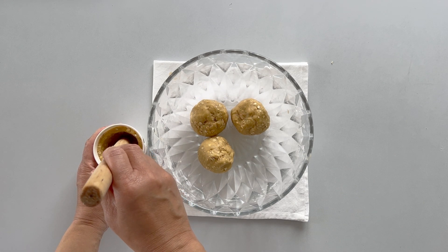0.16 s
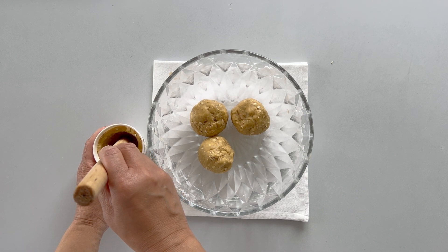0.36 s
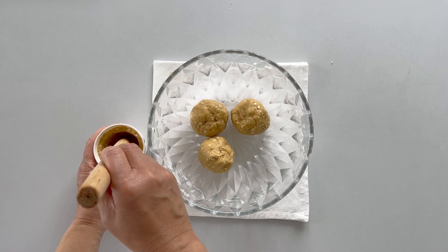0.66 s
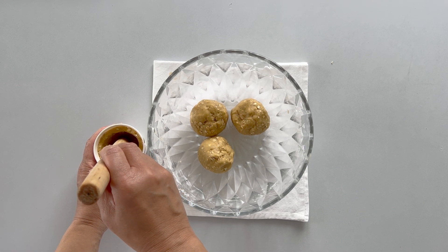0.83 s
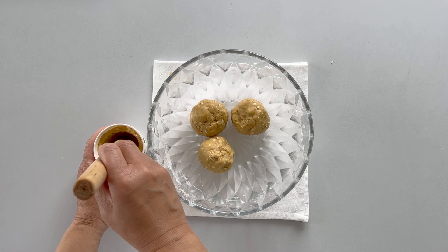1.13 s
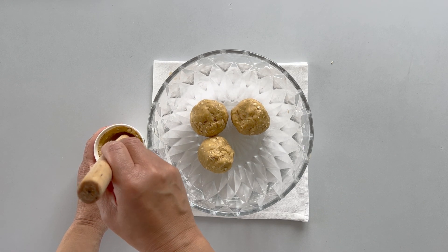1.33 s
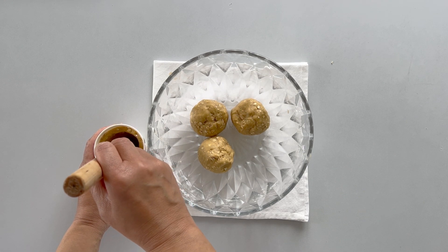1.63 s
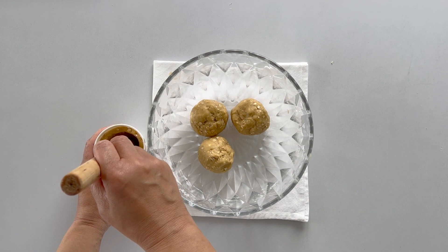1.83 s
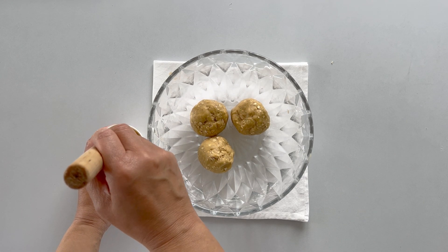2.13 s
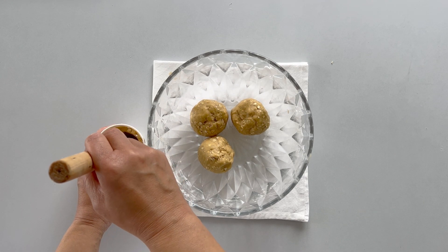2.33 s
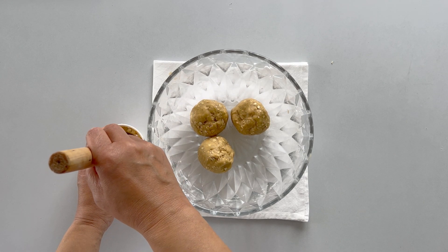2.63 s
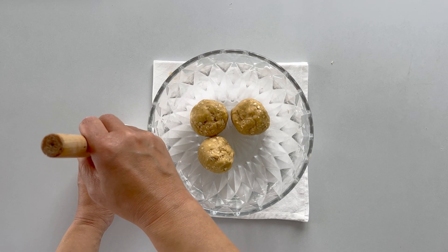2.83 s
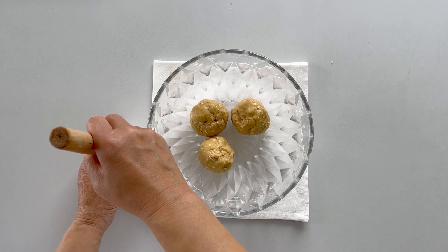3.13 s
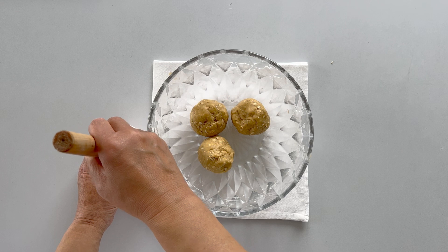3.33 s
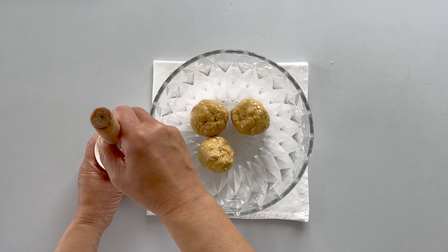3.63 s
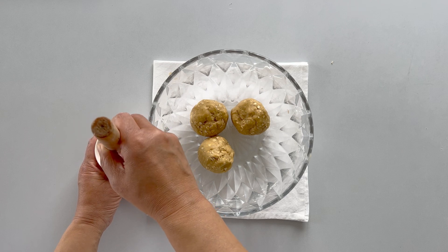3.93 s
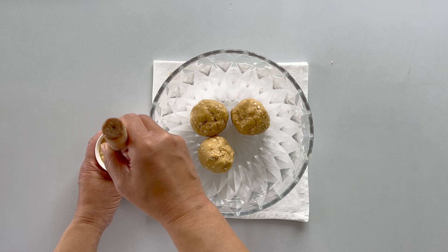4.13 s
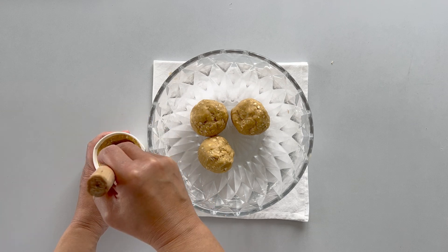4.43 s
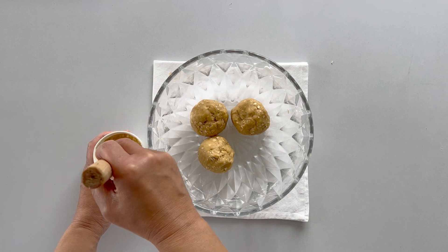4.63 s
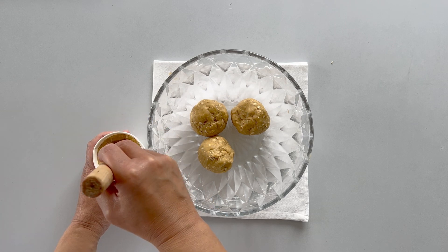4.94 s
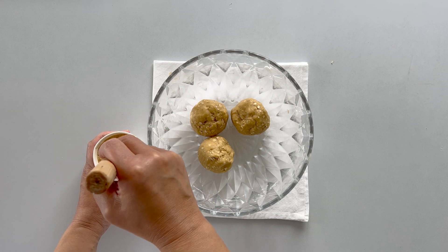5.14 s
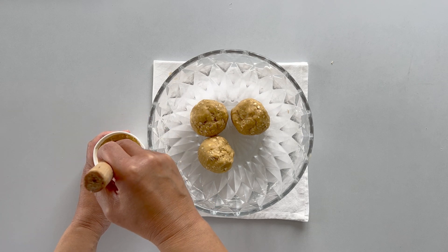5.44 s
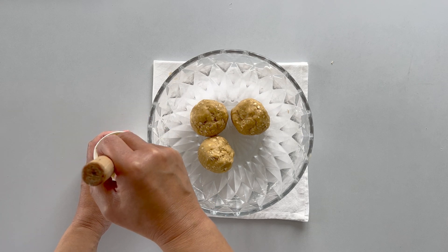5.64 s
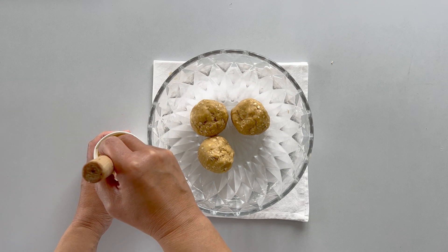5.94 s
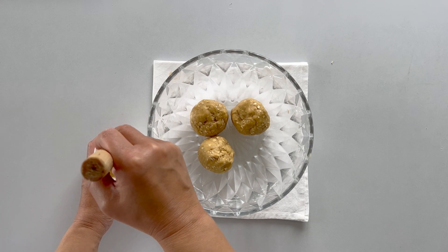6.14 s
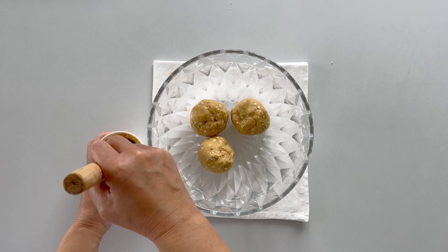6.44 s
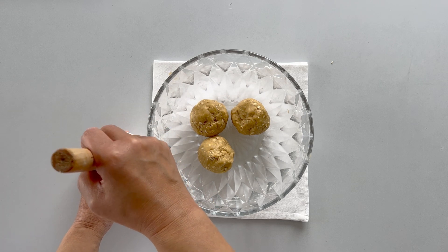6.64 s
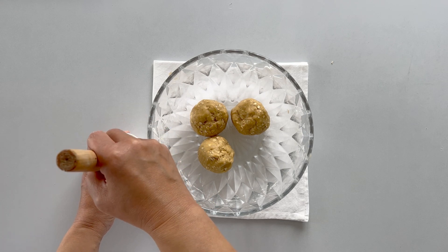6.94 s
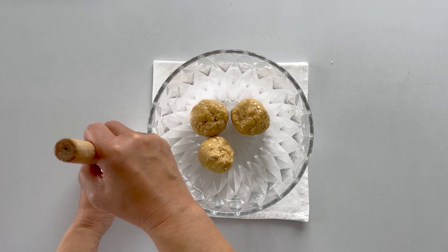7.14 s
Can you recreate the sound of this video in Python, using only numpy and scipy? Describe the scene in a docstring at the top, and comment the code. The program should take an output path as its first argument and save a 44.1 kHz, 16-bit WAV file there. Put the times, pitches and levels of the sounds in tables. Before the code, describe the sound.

A wooden tamper presses sticky dough into a small mould, each push thudding dully on the counter over a soft, low background wash.

```python
"""A wooden tamper presses dough into a small mould on a kitchen counter.
Each push knocks the mould on the counter top: noise and decaying modes pass through the slab and ring a small room.
Bursts of fine noise grains give the dough's sticky crackle; short modes give the taps of wood on the mould.
Behind lie dull room noise and a wavering wash, a low drone that swells and passes, a hum, a whirr and faint chirps."""
import sys
import numpy as np
from scipy import signal
from scipy.fft import rfft, irfft, next_fast_len
from scipy.io import wavfile
from scipy.ndimage import uniform_filter1d

SR = 44100
rng = np.random.default_rng(int(sys.argv[2]) if len(sys.argv) > 2 else 0)


def materialize(psi):
    """Save the field psi as 16-bit PCM at rate SR to the path in sys.argv[1].

    A 1-D psi becomes a single channel; in a 2-D psi each row is a channel.
    """
    bounded = np.clip(np.atleast_2d(psi).T, -1, 1)
    quanta = np.round(bounded * 32767).astype(np.int16)
    wavfile.write(sys.argv[1], SR, quanta)


N = 320864  # samples

# All levels in the tables are relative.
# knocks of the mould on the counter; a high contact corner is hard, a low one is cushioned by dough:
# (time [s], level [dB], contact corner [Hz], share landing a second time [ratio])
KNOCKS = [(0.4803, -25.5, 685, 0.15), (1.198, -48.5, 398, 0), (1.9534, -23.5, 990, 0),
          (2.6617, -46.5, 750, 0.66), (2.7047, -20, 900, 0.058), (3.375, -38, 473, 0.14),
          (4.123, -26, 326, 0.32), (4.658, -39, 240, 0.061), (5.0525, -22, 390, 0.075),
          (5.5112, -33.5, 260, 0.26), (6.026, -36, 328, 1), (6.389, -51, 257, 0), (6.559, -27, 367, 0.47),
          (6.5661, -22.5, 463, 0.034), (6.5754, -24, 690, 0.068), (6.979, -57.5, 900, 0),
          (7.218, -44, 320, 0)]
# modes of the counter top with the mould on it: (frequency [Hz], level [dB], t60 [s])
COUNTER_MODES = [(139.8, -17.5, 0.13), (206.4, -5.5, 0.13), (282.5, -3.5, 0.056), (327, 0.5, .13),
                 (425, -2, 0.043), (515.6, -5.5, 0.068), (596, -0.5, 0.023), (803, -10.5, 0.055),
                 (879, -16.5, 0.079), (1042, -7.5, 0.025), (1232, -4.5, 0.013), (1532, 3.5, 0.014),
                 (2088, -17.5, 0.15)]
# modes of the mould under a tap: (frequency [Hz], level [dB], t60 [s])
MOULD_MODES = [(1470, -1, 0.014), (1720, 7.5, 0.014), (2250, -18, 0.012), (3850, -13, 0.018),
               (4700, -20, 0.0092)]
# the tamper squeezes the dough and grazes the mould's wall: (time [s], wall tap [dB], dough crackle [dB])
TOUCHES = [(0.48, -68, -73), (1.2, -66.5, -73.5), (1.952, -63, -60), (2.699, -60, -64.5),
           (3.375, -66.5, -72), (4.113, -67.5, -66), (4.427, -71, -83.5), (4.630, -70.5, -70),
           (5.051, -66.5, -69.5), (5.495, -68.5, -73), (6.0162, -59, -70.5), (6.551, -69.5, -68.5),
           (6.980, -69.5, -77), (7.228, -75, -81)]
# sharp snaps of wood on the rim before the hardest knocks:
# (time [s], level [dB], decay constant [s], tilt [dB per octave])
RIM_SNAPS = [(1.935, -49.5, 0.005, 2.5), (2.661, -66.5, 0.013, -3.5)]
# dough peeling off the tamper between pushes: (time [s], level [dB], decay constant [s])
DOUGH_PEELS = [(0.186, -86, 0.18), (0.931, -84, 0.2), (3.85, -81, .025), (4.074, -74, .017),
               (6.161, -79.5, .023), (6.833, -79.5, 0.049)]
# colour of the sticky crackle: (frequency [Hz], level [dB])
STICKY_COLOUR = [(300, -0.5), (1700, 6.5), (2700, -3), (3700, 2), (5200, -6.5), (7400, 3.5), (8600, 1),
                 (10000, -31.5), (12000, 3), (15000, -11), (17000, -15)]
# decay of the room's tail: (frequency [Hz], t60 [s])
ROOM_T60 = [(100, 0.39), (300, 0.32), (800, 0.2), (2000, 0.24), (6000, 0.24), (14000, 0.14)]
# colour of the room's tail: (frequency [Hz], level [dB])
ROOM_COLOUR = [(80, -2), (200, -10), (330, -7.5), (500, -5), (800, 10), (1100, 7), (1600, 3), (2200, 3),
               (3000, 2), (14000, 0.5)]
# left-right likeness of the room's tail: (frequency [Hz], correlation [-1 to 1])
ROOM_LIKENESS = [(100, 0.97), (300, 0.79), (500, 0.23), (800, -0.75), (1500, 0.15), (4000, -0.015)]
# spectrum of the steady room noise: (frequency [Hz], density [dB per Hz])
AIR_COLOUR = [(25, -25), (30, 1), (42, 1), (80, -9.5), (125, -11), (200, -13), (400, -33.5), (2000, -38.5),
              (3200, -52), (5500, -55), (6900, -52), (9800, -68.5), (12500, -58.5), (15500, -68.5)]
# left-right likeness of room noise and wash: (frequency [Hz], correlation [-1 to 1])
AIR_LIKENESS = [(60, 0.97), (300, 0.71), (700, 0.1), (1500, 0.18), (4000, 0.22), (12000, 0.14)]
# spectrum of the distant wash: (frequency [Hz], density [dB per Hz])
WASH_COLOUR = [(100, -19.5), (280, 7.5), (450, 3), (850, -0.5), (1020, -4), (1250, -2), (2100, -12.5),
               (2600, -21), (3100, -30.5), (4000, -44.5)]
# course of the distant wash: (time [s], level [dB])
WASH_COURSE = [(0.0, -64), (0.4, -62.5), (1.34, -67.5), (1.8, -65.5), (2.09, -62.5), (4.07, -67),
               (6.65, -67), (6.77, -70.5), (7.28, -73)]
# faint, high, distant chirps: (time [s], pitch [Hz], level [dB])
CHIRPS = [(1.295, 5700, -88), (2.315, 5400, -90), (3.29, 5250, -88), (7.065, 5030, -93)]

ROCK_S = 0.00674  # a tilted mould lands a second time this much later
# the softer the contact, the more of the hand's weight follows: corner for an equal share, exponent, ceiling
SOFT_HZ, FOLLOW_POWER, FOLLOW_MAX = 283, 5.1, 1.36
# the dough yields just before the wall is met: lead, decay constant, tilt per octave
SQUEEZE_LEAD_S, SQUEEZE_S, SQUEEZE_TILT_DB = 0.016, 0.018, 11
PEEL_TILT_DB = 14  # per octave: thin and fine
CHIRP_S = 0.021  # half-width of a chirp's bell-shaped envelope, where it has fallen to 1/e
# when each background swell is at its fullest (from s, to s), and its level there
DRONE_SPAN, DRONE_DB = (3.37, 3.62), -52
HUM_SPAN, HUM_DB = (1.95, 2.5), -59.5
WHIRR_SPAN, WHIRR_DB = (0.62, 1.1), -76.5
TOP_HZ = 15750  # band limit


def knocks(crack_db=-5, crack_t60=0.071, follow_s=0.00322, follow_hz=900, pad_hz=3500):
    """Every downward push rings the same counter modes; the dough cushions the high ones."""
    out = np.zeros((2, N))
    t = np.arange(SR // 2) / SR
    for s, db, corner_hz, rock in KNOCKS:
        crack = amp(crack_db - 60 * t / crack_t60) * rng.standard_normal(len(t))
        blow = crack - ringing(COUNTER_MODES, t, vary_db=2.17)
        # on a soft press the dough yields first, and the weight of the hand arrives a moment later
        follow = min((SOFT_HZ / corner_hz) ** FOLLOW_POWER, FOLLOW_MAX)

        def path(f):
            contact = 1 / (1 + 1j * f / corner_hz) ** 2 / (1 + 1j * f / pad_hz)
            hand = follow * lag(f, follow_s) / (1 + (f / follow_hz) ** 2)
            second_landing = rock * lag(f, ROCK_S)
            return slab(f) * contact * (1 + hand + second_landing)

        add(out, s, amp(db) * kitchen(filtered(blow, path), wet_db=-4.5))
    return out


def slab(hz, travel_s=0.005144, edge=0.22, edge_s=0.0091, radiate_hz=220):
    """Way through the counter top: bending waves, a return from its edge, weak radiation of the bass."""
    # bending waves slow down at low pitch, so each knock is a short falling chirp; travel_s holds at 300 Hz
    bending = lag(np.sqrt(300 * hz), 2 * travel_s)
    edge_return = edge * lag(hz, edge_s) / (1 + 1j * hz / 2500)
    radiation = (1j * hz / (radiate_hz + 1j * hz)) ** 2
    return bending * (1 - edge_return) * radiation


def ringing(modes, t, vary_db):
    """Decaying modes, a little different in balance at every blow."""
    total = 0
    for hz, db, t60 in modes:
        level_db = db + rng.normal(0, vary_db)
        total = total + amp(level_db - 60 * t / t60) * np.sin(2 * np.pi * hz * t)
    return total


def tamper():
    """The wood squeezes the dough, taps the wall, snaps on the rim and peels free."""
    out = np.zeros((2, N))
    for s, tap_db, dough_db in TOUCHES:
        add(out, s - SQUEEZE_LEAD_S, amp(dough_db) * crackle(SQUEEZE_S, SQUEEZE_TILT_DB))
        add(out, s, amp(tap_db) * tap())
    for s, db, decay_s, tilt_db in RIM_SNAPS:
        add(out, s, amp(db) * crackle(decay_s, tilt_db))
    for s, db, decay_s in DOUGH_PEELS:
        add(out, s, amp(db) * crackle(decay_s, PEEL_TILT_DB))
    return out


def tap(graze=0.1, graze_s=0.0048):
    """A light touch of wood on the mould: an impulse and a brief scrape drive its modes."""
    t = np.arange(SR // 3) / SR
    scrape = graze * rng.standard_normal(len(t)) * np.exp(-t / graze_s)
    force = (t == 0) + scrape
    struck = signal.fftconvolve(force, ringing(MOULD_MODES, t, vary_db=0.5))[:len(t)]
    return kitchen(struck, wet_db=-6)


def crackle(decay_s, tilt_db, clump_db=5, snap_s=0.014):
    """A burst of sticky noise grains: short ones snap, longer ones swell first."""
    t = np.arange(SR // 2) / SR
    clumps = unit(uniform_filter1d(rng.standard_normal(len(t)), size=30))
    grains = unit(rng.standard_normal(len(t)) * amp(clump_db * clumps))
    rise_s = np.clip(decay_s - snap_s, 0.0002, 0.012)
    burst = grains * np.minimum(t / rise_s, np.exp((rise_s - t) / decay_s))

    def colour(f):
        octaves = np.log2(np.maximum(f, 1000) / 12000)
        return amp(along(STICKY_COLOUR, f) + tilt_db * octaves)

    return kitchen(filtered(burst, colour), wet_db=0.5)


def kitchen(x, wet_db, gap_s=0.0086, build_s=0.0016):
    """Direct sound plus the room's diffuse tail: noise that builds after a gap and decays by pitch."""
    t = np.arange(len(x)) / SR
    noise = stereo_noise(len(x), ROOM_COLOUR, ROOM_LIKENESS)
    hz, frames, bins = signal.stft(noise, SR, nperseg=256)
    decay = amp(-60 * frames / along(ROOM_T60, hz)[:, None])
    tail = signal.istft(bins * decay, SR, nperseg=256)[1][:, :len(x)]
    build = 1 + np.tanh((t - gap_s) / build_s)
    tail = unit(tail * build) / np.sqrt(len(x))
    return x + amp(wet_db) * signal.fftconvolve(x[None], tail, axes=1)[:, :len(x)]


def background():
    """Everything behind the tamper, set slightly to the left."""
    low_hum = swell(HUM_SPAN, HUM_DB, fade_db_per_s=23.5) * hum(centre_hz=200.5, width_hz=31)
    whirr = swell(WHIRR_SPAN, WHIRR_DB, fade_db_per_s=49.5) * hum(centre_hz=1960, width_hz=320)
    balance = amp([[0.6], [-0.6]])  # dB, left and right
    return (air() + wash() + drone() + low_hum + whirr + chirps()) * balance


def air(level_db=-57.5):
    """Steady, dull room noise: coloured noise, nearly alike in both ears in the bass."""
    return amp(level_db) * unit(stereo_noise(N, AIR_COLOUR, AIR_LIKENESS))


def wash(trim_db=1.5, waver_db=1.14):
    """A distant wash of coloured noise that wavers, follows its course and fades by the end."""
    waver = waver_db * wander(3)
    gain = amp(trim_db + curve(WASH_COURSE) + waver)
    return gain * unit(stereo_noise(N, WASH_COLOUR, AIR_LIKENESS))


def drone(octave_db=-11, twelfth_db=-15):
    """A swelling low tone with two overtones, wandering slightly around its pitch."""
    pitch_hz = 64.5 + 1.5 * wander(6)
    phase = 2 * np.pi * np.cumsum(pitch_hz) / SR
    tone = np.sin(phase) + amp(octave_db) * np.sin(2 * phase) + amp(twelfth_db) * np.sin(3 * phase)
    return swell(DRONE_SPAN, DRONE_DB, fade_db_per_s=26.5) * unit(tone)


def chirps():
    """Brief, blurred high notes, barely above the room noise: bell-shaped bursts of band noise."""
    t = np.arange(N) / SR
    total = 0
    for s, hz, db in CHIRPS:
        bell = np.exp(-((t - s) / CHIRP_S) ** 2)
        total = total + amp(db) * bell * hum(centre_hz=hz, width_hz=1100)
    return total


def hum(centre_hz, width_hz):
    """A wavering band of noise around one pitch."""
    return unit(filtered(rng.standard_normal(N), lambda f: 1 / (1 + 2j * (f - centre_hz) / width_hz) ** 2))


def swell(span, level_db, fade_db_per_s):
    """Gain that rises, holds through the span and falls away at the same rate."""
    t = np.arange(N) / SR
    return amp(level_db - fade_db_per_s * np.abs(t - np.clip(t, *span)))


def wander(corner_hz):
    """Slow random movement of rms 1: noise kept mostly below the corner."""
    return unit(filtered(rng.standard_normal(N), lambda f: 1 / (1 + (f / corner_hz) ** 4)))


def stereo_noise(size, colour, likeness):
    """Two channels of coloured noise, mixed from mid and side to a given likeness."""
    def mid_side(hz):
        turn = np.arccos(np.clip(along(likeness, hz), -1, 1)) / 2
        return amp(along(colour, hz)) * np.array([np.cos(turn), np.sin(turn)])

    mid, side = filtered(rng.standard_normal((2, size)), mid_side)
    return np.array([mid + side, mid - side])


def amp(db):
    """Decibels to gain."""
    return 10 ** (np.asarray(db) / 20)


def unit(x):
    """Scale to rms 1."""
    return x / np.sqrt(np.mean(x ** 2) + 1e-20)


def along(points, hz):
    """(frequency [Hz], value) points read on a log frequency axis."""
    f, v = np.transpose(points)
    return np.interp(np.log(hz + 1), np.log(f + 1), v)


def curve(points):
    """(time [s], value) points read at every sample."""
    s, v = np.transpose(points)
    return np.interp(np.arange(N) / SR, s, v)


def filtered(x, response):
    """Shape x by a complex response of frequency."""
    n = x.shape[-1]
    m = next_fast_len(n + 8192)  # spare room for delays and ringing
    return irfft(rfft(x, m) * response(np.fft.rfftfreq(m, 1 / SR)), m)[..., :n]


def lag(hz, s):
    """Response of a delay."""
    return np.exp(-2j * np.pi * hz * s)


def add(track, s, sound):
    """Mix a sound into the track at time s."""
    part = track[:, round(s * SR):][:, :sound.shape[-1]]
    part += sound[..., :part.shape[-1]]


def scene():
    """The tamper's knocks, taps and crackles over the room."""
    return knocks() + tamper() + background()


def record(dry, lead_s=0.00004):
    """The left microphone is a little nearer and brighter; nothing is kept above the band limit."""
    def microphones(hz):
        lean = amp(along([(300, 0.078), (1200, 0.0), (4000, 1.7), (8000, 0.95)], hz))  # (Hz, dB)
        right_lag = lag(hz, lead_s / (1 + hz / 4000))
        return np.array([lean, right_lag / lean]) * (hz < TOP_HZ)

    return filtered(dry, microphones)


dry = scene()
out = record(dry)
materialize(out)
```